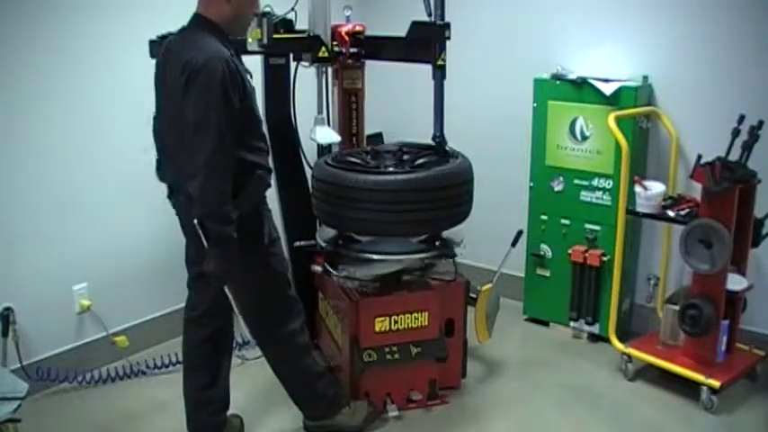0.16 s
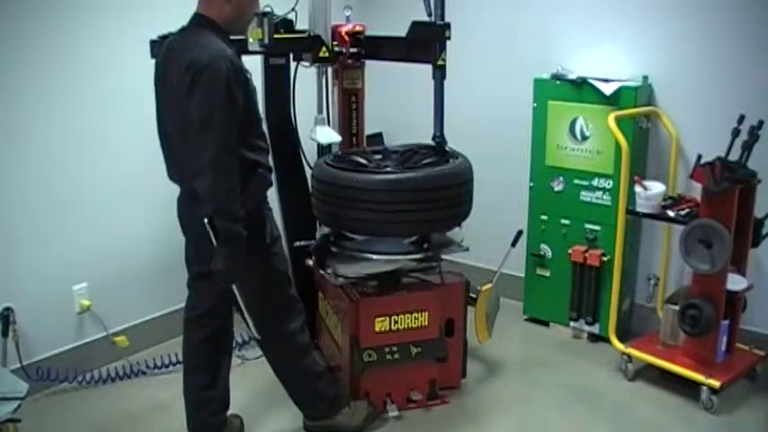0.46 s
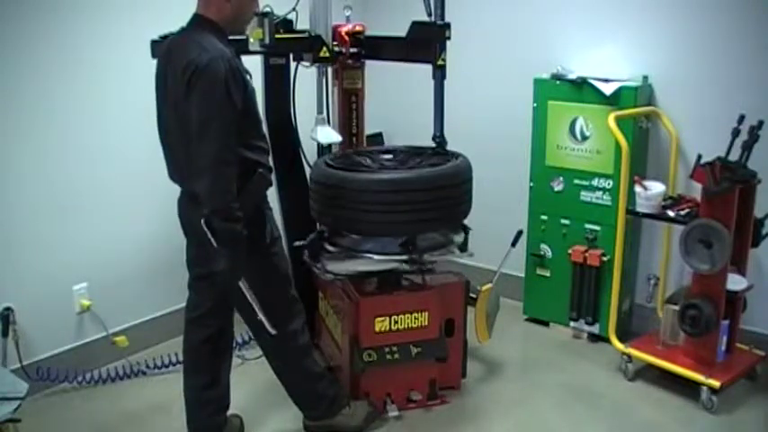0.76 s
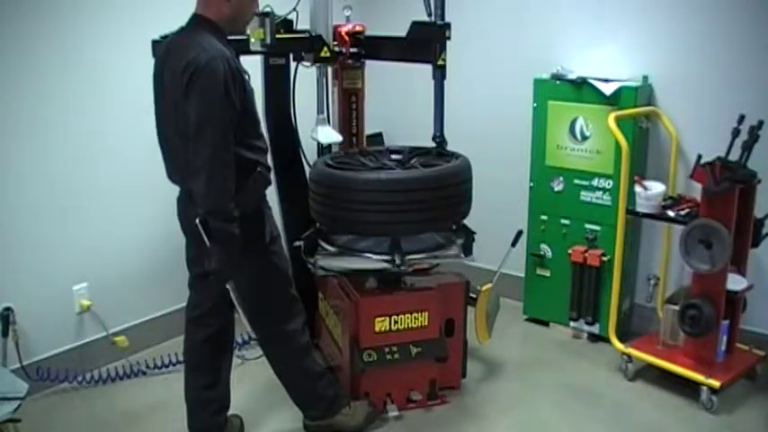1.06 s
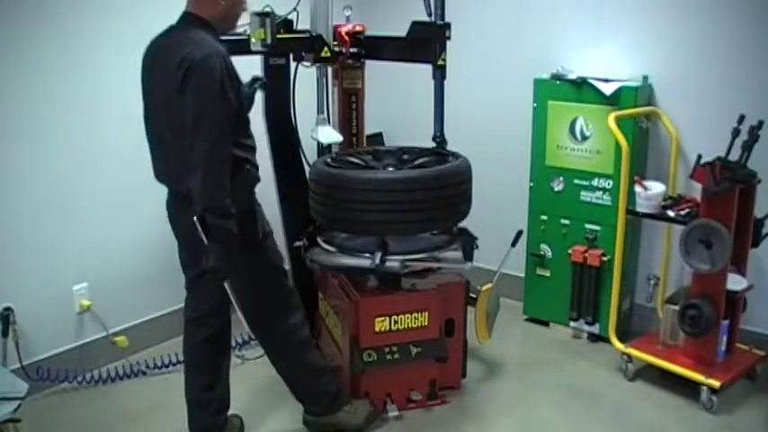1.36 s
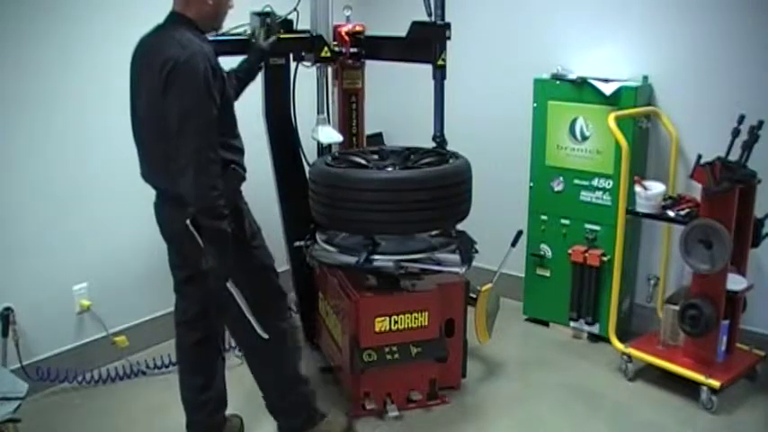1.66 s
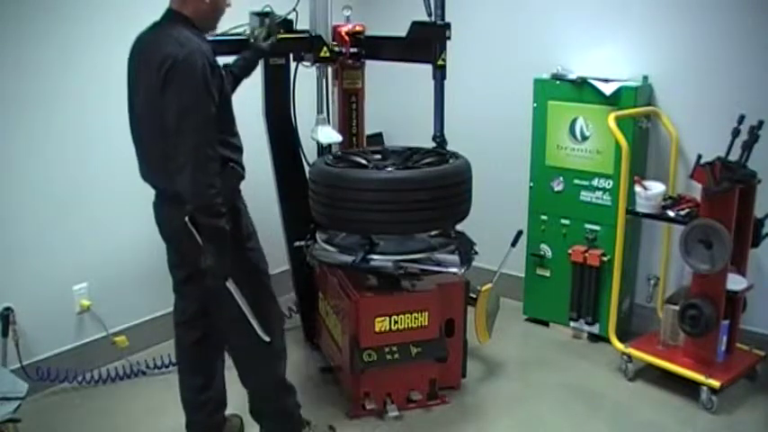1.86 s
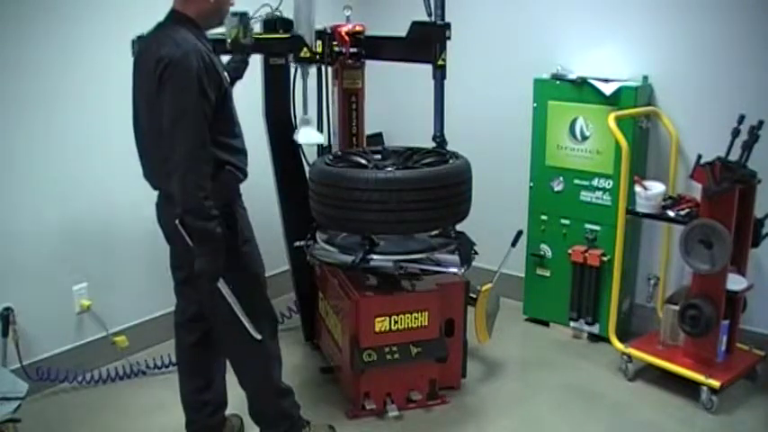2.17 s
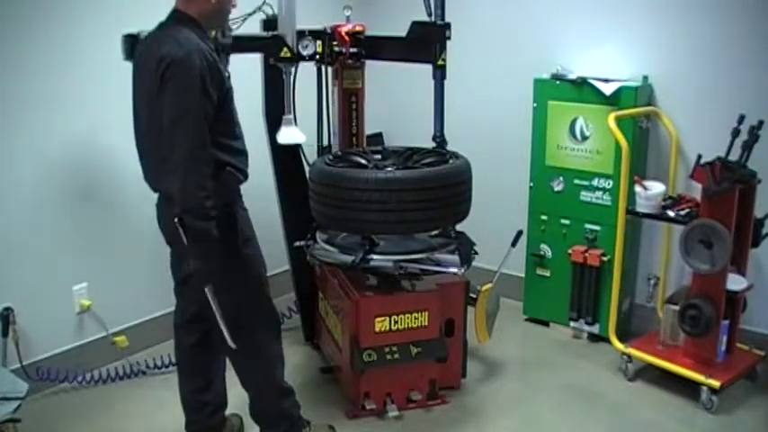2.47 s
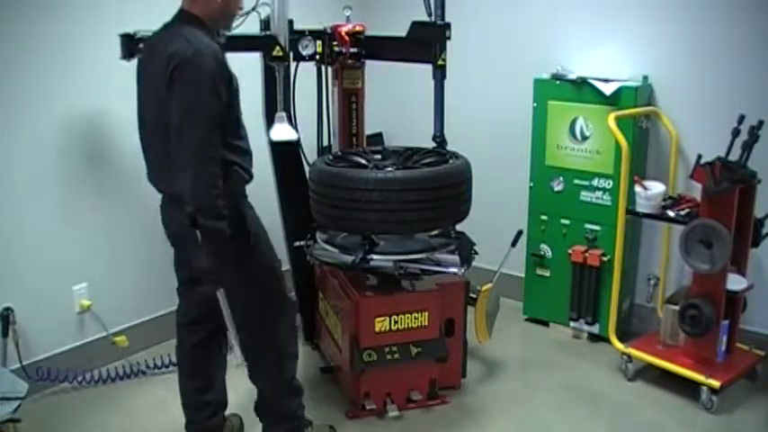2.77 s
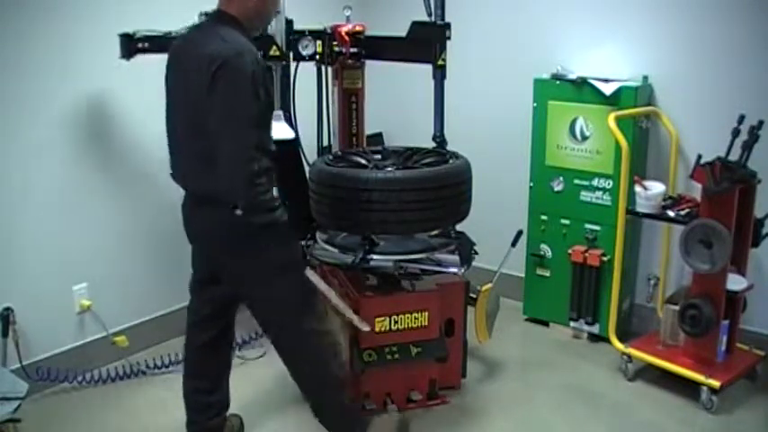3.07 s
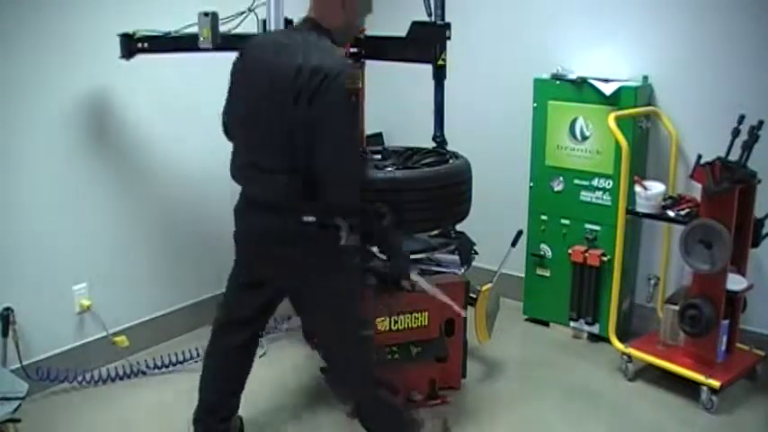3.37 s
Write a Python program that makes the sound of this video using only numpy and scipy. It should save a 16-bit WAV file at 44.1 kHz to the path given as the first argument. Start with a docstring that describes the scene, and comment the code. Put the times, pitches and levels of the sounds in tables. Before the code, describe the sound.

A tyre changer's electric motor hums and whines while the wheel clunks on steel and the tyre bumps the arm; a loud pedal snap stops it, leaving faint footsteps in an echoing bare garage, some metres away.

```python
"""A motor hums and whines, steel clunks, a tyre bumps and a pedal snaps back; then room rumble, ticks and shoe scuffs.
This is a tyre changer in a bare garage, heard by a microphone some metres away. The motor is a set of
wavering sine tones plus flickering noise, and its sound dies away after switch-off. Knocks, ticks, steps and
escaping air are short noise bursts with ringing tones, sent through a room echo together with gritty hisses.
The soft tyre thumps are brief low tones, and steady coloured noise is the garage air."""
import sys
import numpy as np
from scipy import signal
from scipy.fft import rfft, irfft
from scipy.io import wavfile
from scipy.ndimage import uniform_filter1d

SR = 44100
rng = np.random.default_rng(int(sys.argv[2]) if len(sys.argv) > 2 else 0)


def ratio_of_db(decibels):
    """Turn decibels (scalar or array-like) into linear amplitude factors; 0 dB maps to 1."""
    return 10 ** (np.asarray(decibels, float) / 20)


def persist_wave(psi):
    """Save psi, clipped to +-1, as 16-bit WAV."""
    counts = np.round(np.clip(psi, -1, 1) * 32767).astype(np.int16)
    wavfile.write(sys.argv[1], SR, np.atleast_2d(counts).T)


N = 154350
T = np.arange(N) / SR  # time of each sample [s]

# sound colour of the foot pedal and its valve: (frequency [Hz], relative level per Hz [dB])
PEDAL_COLOUR = [(35, -41), (60, -36), (220, 7.5), (688, -3), (829, 4.5), (1070, -1), (1590, -4.5),
                (2250, -7), (5200, -14.5), (7030, -11.5), (10200, -17), (15500, -34)]


def curve(table, hz):
    """Read a table at any frequency, with straight lines between its points on a log-frequency axis."""
    rows = np.array(table, float)
    return np.interp(np.log(np.maximum(hz, 1)), np.log(rows[:, 0]), rows[:, 1])


def colour(x, table, tilt_db=0):
    """Shape a signal's spectrum, tilted about 1 kHz by tilt_db per octave."""
    hz = np.fft.rfftfreq(x.shape[-1], 1 / SR)
    tilt = tilt_db * np.log2(np.maximum(hz, 30) / 1000)
    return irfft(rfft(x) * ratio_of_db(curve(table, hz) + tilt), x.shape[-1])


def unit(x):
    """Scale to rms 1."""
    return x / np.sqrt(np.mean(x ** 2))


def walk(rate):
    """Slow random drift of rms 1, from about `rate` new random values per second, smoothed."""
    k = int(SR / rate)
    steps = np.repeat(rng.standard_normal(N // k + 1), k)
    smooth = uniform_filter1d(uniform_filter1d(steps, k), k)
    return unit(smooth[:N])


def spread(mid, side):
    """Left and right: the side signal is added on the left and subtracted on the right."""
    # stereo width: (frequency [Hz], gain of the side signal [dB])
    side_gain = [(60, -18.5), (200, -16), (700, -11.5), (2380, -9.5), (4400, -8), (8120, -4), (15000, 1)]
    side = colour(side, side_gain)
    return np.array([mid + side, mid - side])


def noise(table, flicker_db):
    """Diffuse stereo noise whose octave bands flicker in level on their own."""
    hz, out = np.fft.rfftfreq(N, 1 / SR), 0
    mid, side = colour(rng.standard_normal((2, N)), table)
    spec = rfft(spread(mid, side))
    for octave in range(10):  # overlapping bands, from 32 Hz up
        share = np.clip(1 - np.abs(np.log2(np.maximum(hz, 32) / 32) - octave), 0, 1)
        out = out + irfft(spec * share, N) * ratio_of_db(flicker_db * walk(11))
    return unit(out)


def blows(events, body, modes, ring_db, ring_t60, attack_s):
    """Each blow: a crack of coloured noise, then the object's crowds of close modes ring on and drift apart."""
    out, t = np.zeros(N + SR), np.arange(SR // 4) / SR
    mode_hz, mode_db, width = np.array(modes, float).T
    fade = np.minimum(1, 10 * (1 - t / t[-1]))  # the last tenth fades to nothing
    for s, db, tilt_db, t60 in events:
        crack = unit(colour(rng.standard_normal(len(t)), body, tilt_db)) * 1000. ** (-t / t60)
        # sixteen close tones in each crowd
        hz = mode_hz[:, None] + width[:, None] * rng.standard_normal(size=(len(modes), 16))
        # wide crowds start out of step
        start = np.minimum(width[:, None] / 60, 3) * rng.standard_normal(hz.shape)
        crowds = np.sin(2 * np.pi * hz[:, :, None] * t + start[:, :, None]).sum(axis=1)
        size = ratio_of_db(mode_db + tilt_db * np.log2(mode_hz / 1000))
        ring = ratio_of_db(ring_db) * unit(size @ crowds) * 1000. ** (-t / ring_t60)
        first = int(s * SR)
        out[first:first + len(t)] += ratio_of_db(db) * (crack + ring) * (1 - np.exp(-t / attack_s)) * fade
    return out[:N]


def room(x):
    """Direct sound plus a dense tail of noise that decays band by band."""
    # echo: (frequency [Hz], time to fall by 60 dB [s])
    decay_times = [(125, 1), (500, 0.8), (2000, 0.54), (6000, 0.8), (10000, 0.49), (15000, 0.2)]
    tail_db, n = 1.5, SR
    t, hz = np.arange(n) / SR, np.fft.rfftfreq(n, 1 / SR)
    spec, tail = rfft(rng.standard_normal((2, n))), 0
    for octave in range(9):  # overlapping bands, from 64 Hz up
        share = np.clip(1 - np.abs(np.log2(np.maximum(hz, 64) / 64) - octave), 0, 1)
        tail = tail + irfft(spec * share, n) * 1000. ** (-t / curve(decay_times, 64 * 2. ** octave))
    tail *= 1 - np.exp(-t / 0.00043)  # the tail builds up within a few milliseconds
    tail = tail / np.sqrt(np.sum(tail[0] ** 2))
    wet = signal.fftconvolve(x[None], tail, axes=1)[:, :N]
    return x + ratio_of_db(tail_db) * spread(wet[0], 0.84 * wet[1])


def garage_air():
    """Room rumble: nearly steady coloured noise, slightly louder on the left."""
    # air noise: (frequency [Hz], relative level per Hz [dB])
    air_colour = [(25, -45), (45, -13), (65, -4), (101, -7), (183, -2), (250, -9), (378, -16.5),
                  (804, -19.5), (2000, -31), (5000, -42), (10500, -45), (12500, -60), (15500, -72)]
    level_db, left_minus_right_db = -39, 0.75
    balance = left_minus_right_db * np.array([[.5], [-.5]])
    return ratio_of_db(level_db + balance) * noise(air_colour, flicker_db=0.24)


def scuffs():
    """Short gritty hisses, mostly of dragged rubber: noise swells that waver fast in level."""
    # the fading end of an earlier sound, tyre rubber slipping on the rim, then soles on the floor:
    # (centre [s], half width [s], level [dB])
    swells = [(0.02, 0.034, -50), (0.781, 0.017, -32.5), (2.64, 0.049, -62.5), (3.14, 0.049, -53.5)]
    # gritty hiss: (frequency [Hz], relative level per Hz before a tilt [dB])
    hiss_colour = [(200, -26.5), (800, -1), (2000, 7), (4000, -2), (9000, -7.5), (12000, -18), (15500, -45)]
    shape = sum(ratio_of_db(db) * np.exp(-.5 * ((T - s) / w) ** 2) for s, w, db in swells)
    hiss = unit(colour(rng.standard_normal(N), hiss_colour, 5.7))
    return shape * hiss * ratio_of_db(1.0 * walk(71))


def ticks_and_steps():
    """Small bright ticks and shoe steps on concrete: each is a noise burst with one crowd of close tones."""
    # three ticks, then steps:
    # (time [s], level [dB], tilt [dB per octave], time for the noise to fall by 60 dB [s])
    ticks_then_steps = [(2.34, -58, 17, .015), (2.57, -55, 10, .015), (2.98, -44, 5, 0.017),
                        (3.017, -35, -2.5, 0.14), (3.055, -44, -1, 0.12), (3.492, -38, 0, 0.058)]
    # heel, also used for the ticks: (frequency [Hz], relative level per Hz [dB])
    heel_colour = [(100, -7), (400, -1), (1100, -8), (1800, -20), (2800, -9), (4000, -22), (10000, -23),
                   (15500, -50)]
    # ringing of the sole, also used for the ticks:
    # (frequency [Hz], relative level [dB], width of the crowd [Hz])
    sole_ring = [(1784, 1, 195)]
    return blows(ticks_then_steps, heel_colour, sole_ring, ring_db=-1.5, ring_t60=0.046, attack_s=0.0021)


def pedal_valve():
    """Air escaping from the pedal valve: a hiss that dies away, with a short rough whistle."""
    # puff: (time [s], level [dB], tilt [dB per octave], time for the hiss to fall by 60 dB [s])
    puff = [(1.477, -31.5, 0.33, 0.43)]
    # whistle: (frequency [Hz], relative level [dB], width of the crowd [Hz])
    whistle = [(7260, 0, 490)]
    return blows(puff, PEDAL_COLOUR, whistle, ring_db=-1.5, ring_t60=0.083, attack_s=0.0014)


def pedal_clacks():
    """The foot pedal snaps back: sharp cracks and the ringing of its parts."""
    # clacks: (time [s], level [dB], tilt [dB per octave], time for the crack to fall by 60 dB [s])
    clacks = [(1.528, -10.5, 3, 0.05), (1.540, -17.5, -2.5, 0.05), (1.731, -27, -1, 0.033)]
    # ringing of the pedal: (frequency [Hz], relative level [dB], width of each crowd [Hz])
    pedal_ring = [(507.3, -2.5, 50), (792, -1, 92), (1610, -3.5, 89), (2813, -2, 172), (6330, -8.5, 177),
                  (7250, -10.5, 260), (8550, -13, 180)]
    return blows(clacks, PEDAL_COLOUR, pedal_ring, ring_db=-7.5, ring_t60=0.094, attack_s=0.0011)


def tyre_thumps():
    """Soft rubber blows of the tyre carcass: a low tone that dies within a few cycles."""
    # thumps: (time [s], level before decay [dB peak], frequency [Hz], time to fall by 60 dB [s])
    thumps = [(.7555, -9.5, 245, 0.037), (0.8318, -14, 320, 0.043)]
    out = 0
    for s, db, hz, t60 in thumps:
        t = np.maximum(T - s, 0)
        out = out - ratio_of_db(db) * np.sin(2 * np.pi * hz * t) * 1000. ** (-t / t60)
    return out


def arm_bumps():
    """The tyre bumps the mounting arm: a dull crack and the ringing of the arm."""
    # bumps: (time [s], level [dB], tilt [dB per octave], time for the crack to fall by 60 dB [s])
    bumps = [(.706, -21.5, 3, 0.04), (.716, -13, 1.5, 0.034), (.780, -14.5, 1.5, 0.09),
             (.795, -20, -2, 0.045), (.825, -37, -7, 0.022)]
    # arm: (frequency [Hz], relative level per Hz [dB])
    arm_colour = [(40, -18), (70, -26), (250, 8.5), (800, 2), (1100, -8.5), (2000, -8), (3500, -27.5),
                  (9000, -28.5), (15500, -53)]
    # ringing of the arm: (frequency [Hz], relative level [dB], width of each crowd [Hz])
    arm_ring = [(414, 1, 50), (543, 2.5, 64), (799, -1, 32), (1422, -1, 63), (1940, -4, 88),
                (3240, -12, 110)]
    return blows(bumps, arm_colour, arm_ring, ring_db=-6.5, ring_t60=0.073, attack_s=0.0016)


def wheel_clunks():
    """The wheel clunks against the steel: hard cracks and the ringing of the wheel."""
    # clunks: (time [s], level [dB], tilt [dB per octave], time for the crack to fall by 60 dB [s])
    clunks = [(.141, -7, -2, 0.038), (.150, -7.5, 0.5, 0.033), (.185, -18, 3.5, 0.087),
              (.21, -13, 0, 0.027), (.28, -13, -0.5, 0.018)]
    # wheel: (frequency [Hz], relative level per Hz [dB])
    wheel_colour = [(40, -44), (70, -12), (130, -45), (300, -4.5), (869, -12.5), (1050, -15), (1550, -7.5),
                    (3930, -19.5), (9740, -20.5), (12000, -30.5), (15500, -47)]
    # ringing of the wheel: (frequency [Hz], relative level [dB], width of each crowd [Hz])
    wheel_ring = [(342, 5.5, 48.4), (421, 0.5, 35), (543, -4.5, 23), (799, -0.5, 27), (877, -1.5, 45),
                  (1520, -0.5, 44), (1862, 0, 100), (2226, 3.5, 71), (3260, -5, 260)]
    return blows(clunks, wheel_colour, wheel_ring, ring_db=-8.5, ring_t60=0.072, attack_s=0.00079)


def tone(phase, db, waver_db):
    """A sine of given rms level that wavers slowly, starting at a random point of its cycle."""
    level = np.sqrt(2) * ratio_of_db(db + waver_db * walk(14.43))
    return level * np.sin(phase + 2 * np.pi * rng.random())


def motor():
    """Mains hum, slot whine with mains sidebands, gear tones and bearing whirr; all die at switch-off."""
    # load: (time [s], second hum line [dB], change of slot tone and next sideband [dB],
    # change of the other slot lines [dB])
    load = np.array([(0, -23.5, 5.5, -5), (.13, -26.5, 4, -3), (.3, -22.5, 1.5, -4), (.68, -23, 0.5, -4.5),
                     (.8, -21, 1, -5), (.92, -23.5, -2, -1.5), (1.05, -22.5, 0.5, -1.5),
                     (1.5, -22.5, -0.5, -1)], float)
    # lowest hum line, which weakens and wavers once the tyre meets the arm: (time [s], level [dB])
    low_hum = [(0, -26), (.67, -26.5), (.73, -32), (.77, -29), (.83, -49), (.905, -27.5), (1.01, -42),
               (1.05, -33), (1.12, -35), (1.17, -57), (1.3, -46), (1.4, -41), (1.52, -28.5)]
    # higher hum lines: (multiple of the lowest hum line, level [dB])
    upper_hum = [(3, -40), (4, -47)]
    # whine lines: (multiple of the slot tone, multiple of the lowest hum line added to it)
    whine_orders = [(1, -2), (1, -1), (1, 0), (1, 1), (1, 2), (1, 3), (1, 4), (1, 5), (3, 1), (4, 0)]
    # level of each whine line before the change with load: (level [dB])
    whine_levels = [-41, -44.5, -36.5, -39.5, -38.5, -45, -39, -64, -57, -69]
    # gear tones: (frequency at full speed [Hz], level [dB])
    gears = [(623, -42.5), (424.5, -48), (1350, -50)]
    # bearing whirr: (frequency [Hz], relative level per Hz [dB])
    whirr_colour, whirr_db = [(40, -25), (65, -13), (182, -15.5), (306, -13.5), (933, -20), (1870, -22),
                              (2400, -30.5), (4200, -40), (8270, -48.5), (11000, -56.5), (15000, -84)], -33
    hum_hz = 120  # twice the 60 Hz supply
    slot_hz, sag_hz = 1351.6, 20  # rotor slot tone at full speed, and its sag under load
    freed_s, spin_up_s = 0.1437, 0.119  # the load on the turntable eases; time constant of the recovery
    off_s, off_t60_s = 1.486, 0.67  # switched off; time for its sound to fall by 60 dB in the room

    second_db, main_change_db, other_change_db = [np.interp(T, load[:, 0], load[:, k]) for k in range(1, 4)]
    hum = 2 * np.pi * hum_hz * T
    sag = sag_hz * np.exp(-np.maximum(T - freed_s, 0) / spin_up_s)
    slot = 2 * np.pi * np.cumsum(slot_hz - sag + 0.31 * walk(10.7)) / SR

    tones = tone(hum, np.interp(T, *np.array(low_hum).T), 0.4)
    tones += tone(2 * hum, second_db, 0.99)
    for k, db in upper_hum:
        tones += tone(round(k) * hum, db, 0.5)
    for (m, k), db in zip(whine_orders, whine_levels):
        change_db = main_change_db if (m, k) in ((1, 0), (1, 1)) else other_change_db
        tones += tone(m * slot + k * hum, db + change_db, 1.2)
    for hz, db in gears:
        tones += tone(slot * hz / slot_hz, db, 0.89)

    # the side signal is the same tones a quarter cycle apart
    stereo = spread(tones, 0.43 * np.imag(signal.hilbert(tones)))
    whirr = ratio_of_db(whirr_db) * noise(whirr_colour, flicker_db=3.8)
    return (stereo + whirr) * 1000. ** (-np.maximum(T - off_s, 0) / off_t60_s)


def scene():
    """Motor, knocks, scuffs, ticks and steps in the garage air; the motor and thumps get no added echo."""
    hits = scuffs() + ticks_and_steps() + pedal_valve() + pedal_clacks() + arm_bumps() + wheel_clunks()
    return garage_air() + room(hits) + tyre_thumps() + motor()


def low_pass(x):
    """Removes everything above the highest recorded frequency."""
    return signal.sosfilt(signal.butter(12, 15820, fs=SR, output="sos"), x)


def record(dry):
    """The microphone trims the lowest and highest frequencies and clips at full scale."""
    low_hz, top_hz = 44.7, 15600
    x = signal.sosfilt(signal.butter(2, low_hz, "high", fs=SR, output="sos"), dry)
    x = signal.sosfilt(signal.ellip(8, .2, 70, top_hz, fs=SR, output="sos"), x)
    return low_pass(np.clip(x, -1, 1))


dry = scene()
out = record(dry)
persist_wave(out)
```